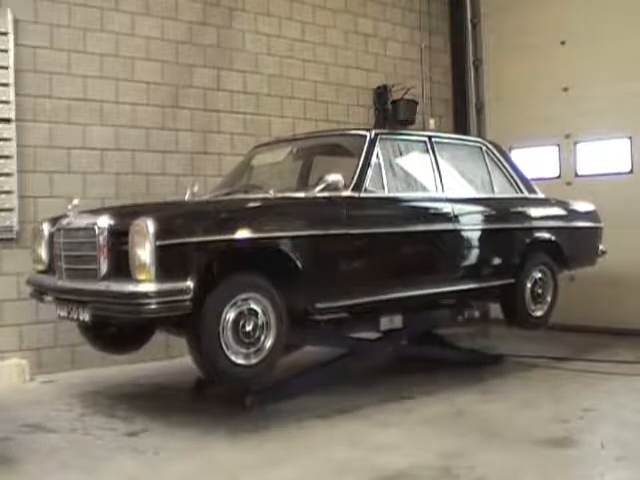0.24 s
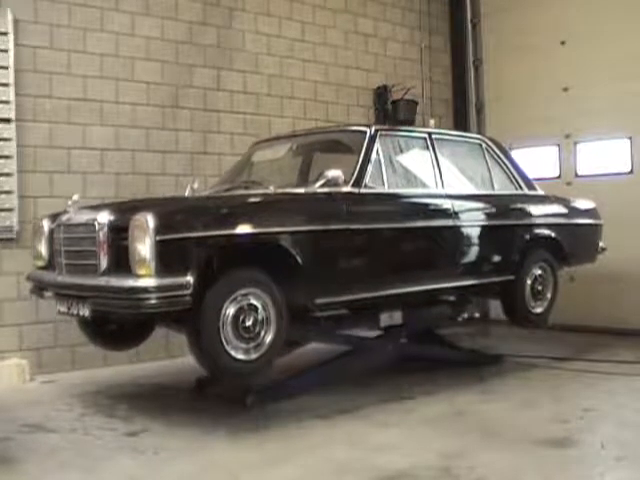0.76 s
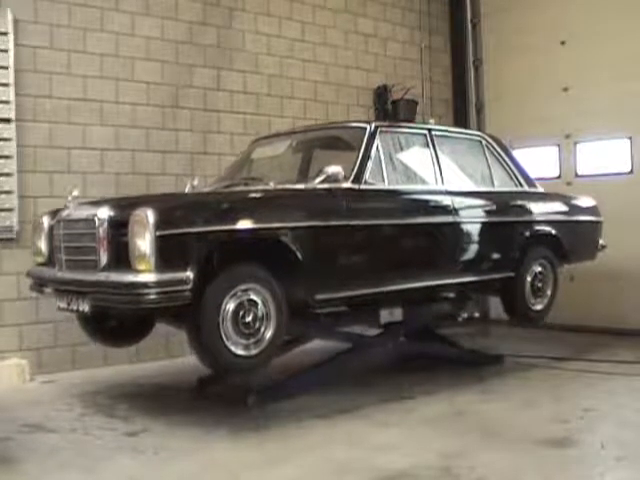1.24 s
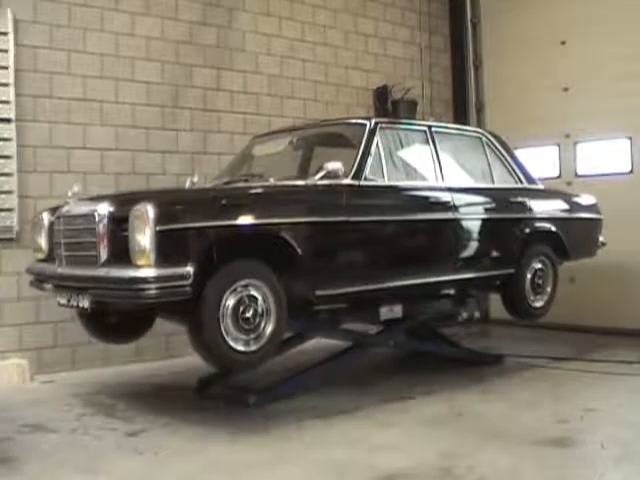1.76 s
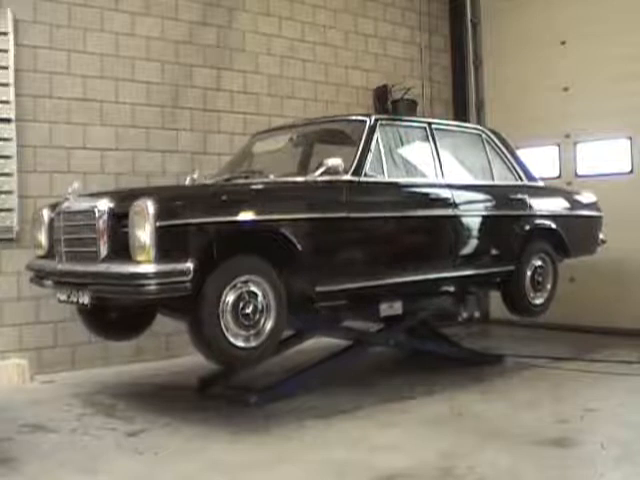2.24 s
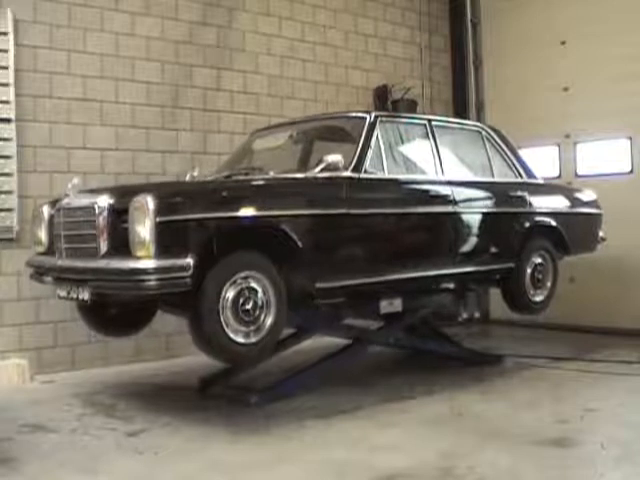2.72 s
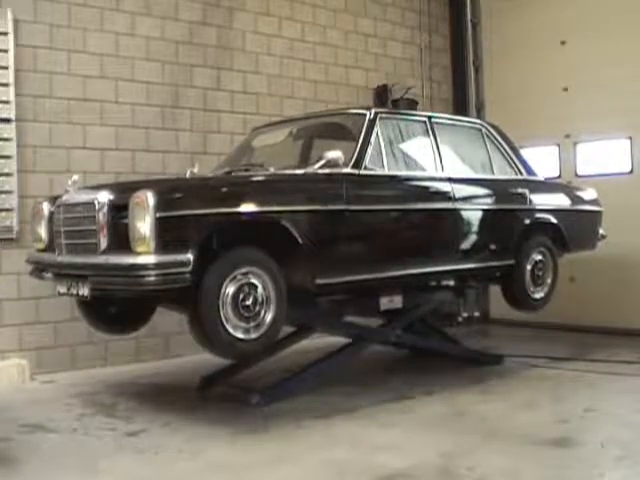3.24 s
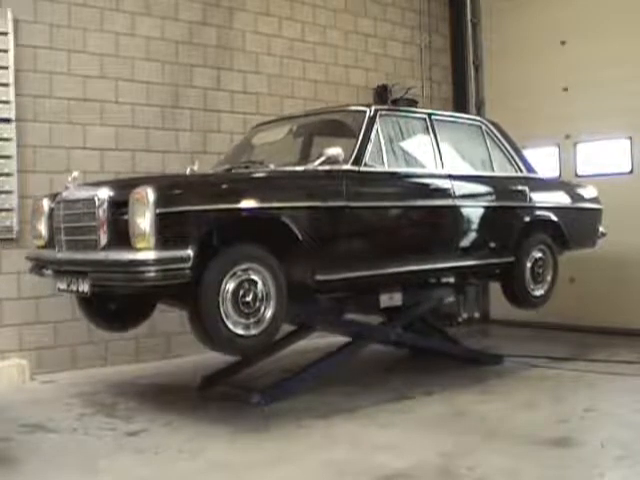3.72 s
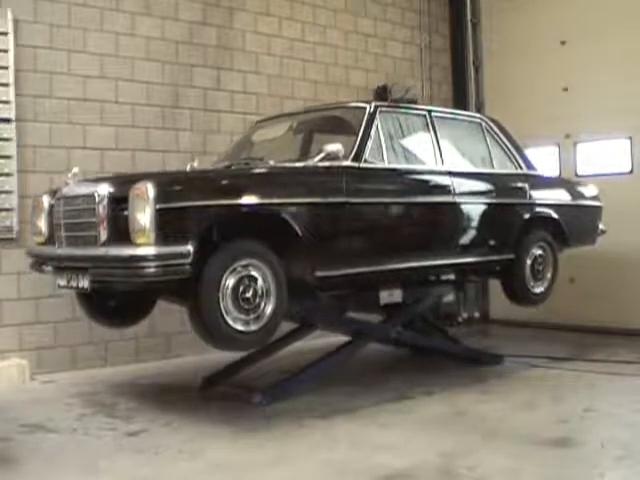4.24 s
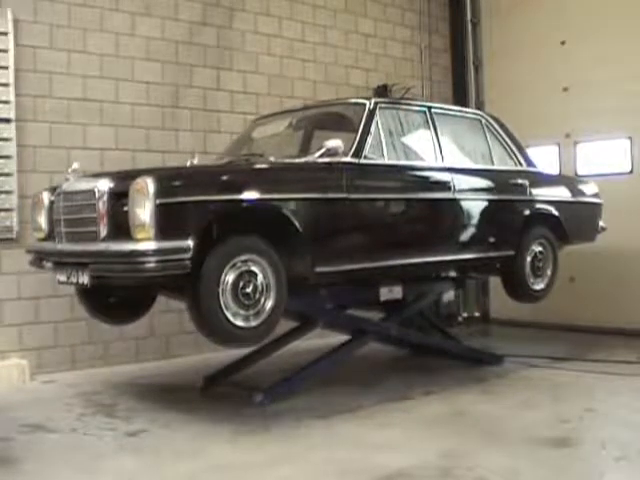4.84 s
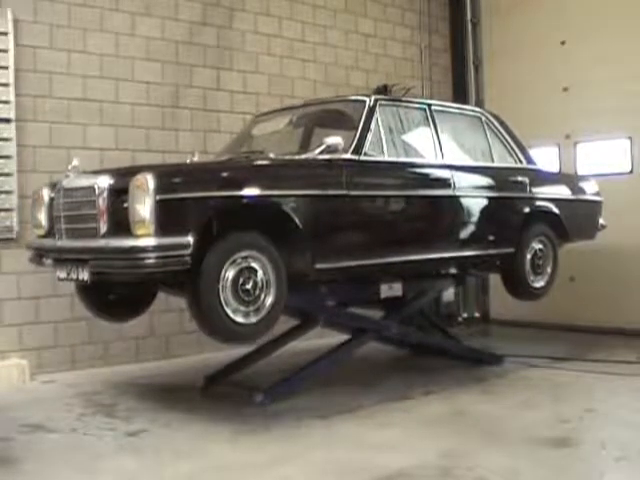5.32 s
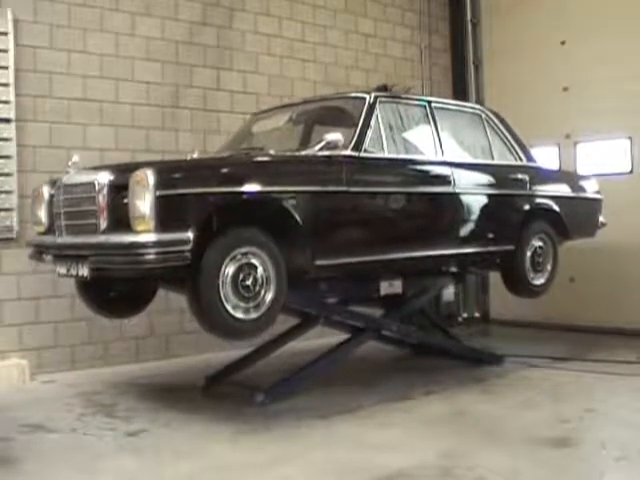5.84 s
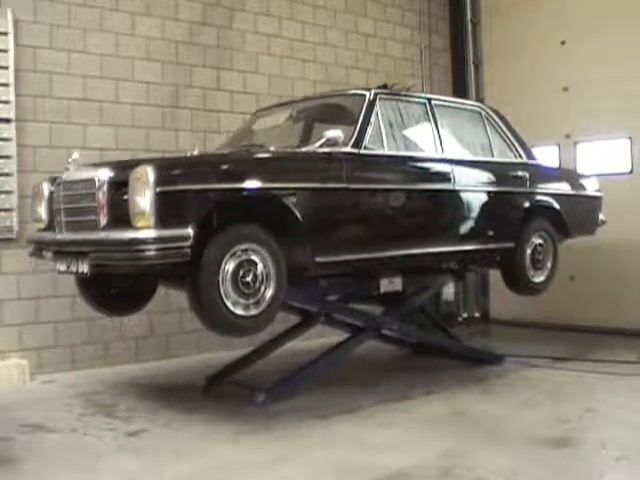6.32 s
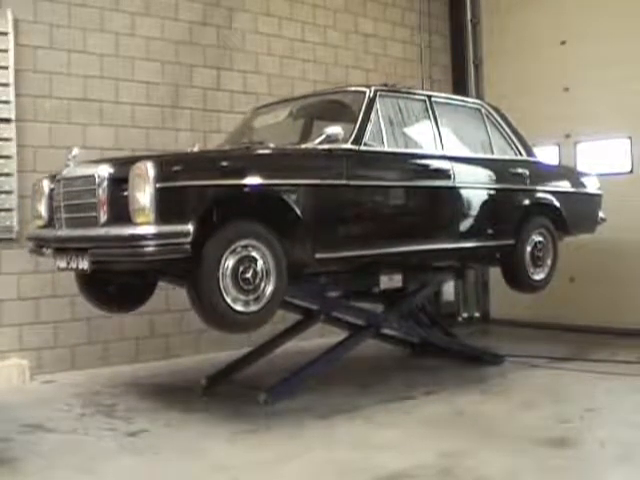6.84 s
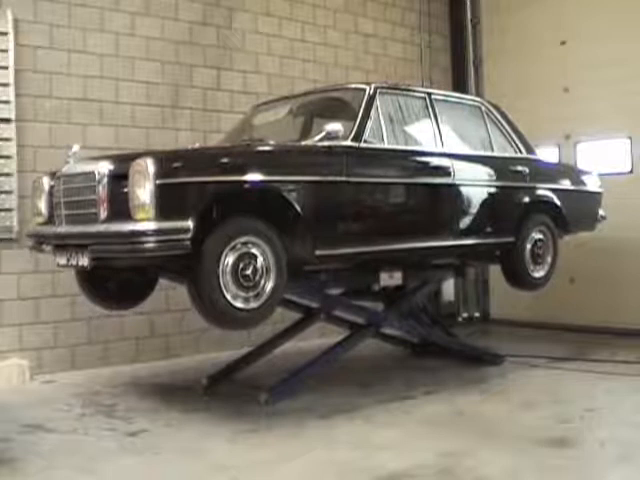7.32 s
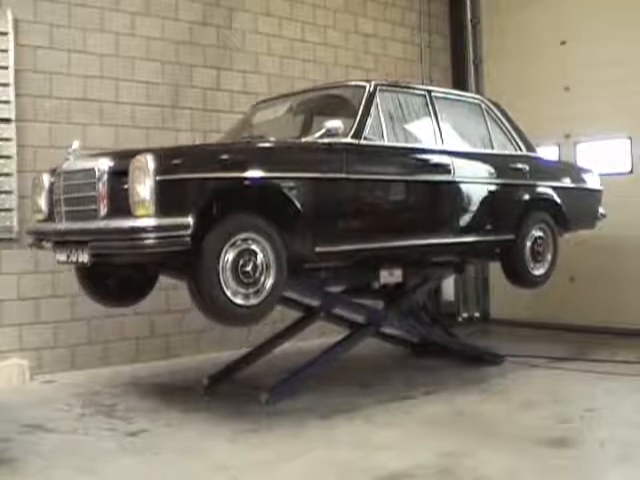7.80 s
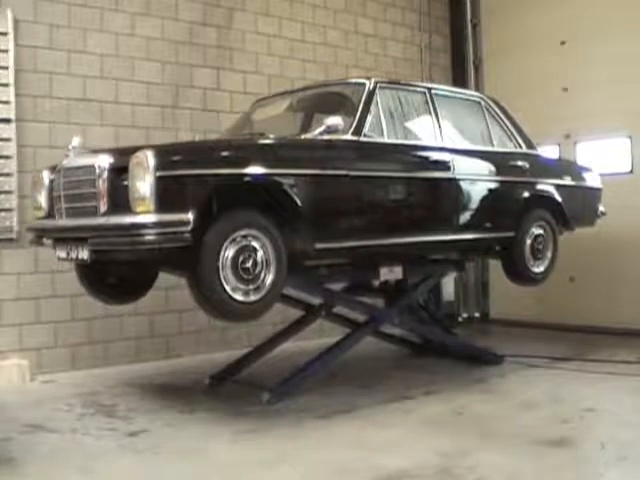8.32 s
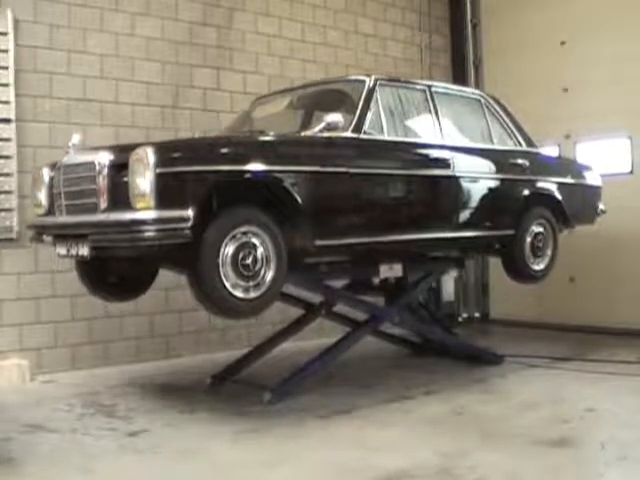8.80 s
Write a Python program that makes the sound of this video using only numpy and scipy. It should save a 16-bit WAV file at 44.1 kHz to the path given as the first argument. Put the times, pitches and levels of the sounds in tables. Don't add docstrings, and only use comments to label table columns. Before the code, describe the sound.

A constant, dense, buzzing mechanical whine, nearly fixed in pitch, with slowly swelling and fading overtones, comes from a hydraulic pump. Flowing oil adds hiss, and mains hum sits low. Three bright metallic clanks, evenly spaced almost four seconds apart, cut through it, each a rapid double hit with a short hollow garage echo. Stereo pickup, close to mono, with slightly coarse treble.

```python
import sys
import numpy as np
from scipy import signal
from scipy.fft import rfft, irfft, next_fast_len
from scipy.io import wavfile
from scipy.ndimage import uniform_filter1d, map_coordinates

SR = 44100
rng = np.random.default_rng(int(sys.argv[2]) if len(sys.argv) > 2 else 0)


def put_to_file(sound):
    columns = np.atleast_2d(sound).T
    safe = np.clip(columns, -1, 1)
    whole_steps = np.round(safe * 32767)
    wavfile.write(sys.argv[1], SR, whole_steps.astype(np.int16))


def field_ratio(decibels):
    return 10 ** (np.asarray(decibels, dtype=float) / 20)


N = 399546
T = np.arange(N) / SR

TEETH = 9
START_HZ, GAIN_HZ, SETTLE_S = 48.759, .302, 5.3
ECHO_S, STEADY = .11, .3
RUMBLE_DB, THUD_T60_S = -62, 0.36
PASSING_S, PASSING_HALF_WIDTH_S, PASSING_LIFT_DB = 8.3, .3, 9.4
BOUNCE_S, BOUNCE_DB = .022, -4

# (tooth harmonic, 2 below [dB], 1 below [dB], itself [dB], 1 above [dB], 2 above [dB])
TOOTH_TONES = [(1, -69, -56.5, -48, -60.5, -57.5), (2, -68.5, -64, -44.5, -72, -80),
               (3, -54, -66, -56.5, -70, -103), (4, -59, -58.5, -48.5, -67.5, -57),
               (5, -55, -47, -44, -50, -44), (6, -50, -41, -45.5, -49.5, -58.5),
               (7, -54, -61, -42, -52, -57), (8, -52.5, -48, -52, -50, -53), (9, -64, -59.5, -54, -72, -59),
               (10, -64.5, -61.5, -58, -63, -81), (11, -64, -64.5, -57, -74, -70),
               (12, -51, -52.5, -51.5, -49.5, -55.5), (13, -58, -42, -52, -48, -59),
               (14, -51.5, -48, -37.5, -44.5, -51), (15, -52, -57.5, -64, -68, -60),
               (16, -81, -61.5, -59.5, -73.0, -65)]
# (tooth harmonic, level [dB], first sidebands [dB])
HIGH_TOOTH_TONES = [(17, -60.5, -80), (18, -62, -70), (19, -64.5, -68), (20, -64.5, -70),
                    (21, -64.5, -69.5), (22, -64, -73), (23, -63.5, -71), (24, -59.5, -81), (25, -62, -91),
                    (26, -69.5, -87), (27, -66.5, -92), (28, -73, -89), (29, -75, -90), (30, -79.5, -98),
                    (31, -100.0, -100)]
# (shaft order, time [s], half-width [s], lift [dB])
STANDING_WAVES = [(8, 8, 1.9, 8), (9, 0.99, 2.28, 18.5), (9, 8, 2.3, 7), (18, 4.8, 2.9, -5),
                  (36, 0.1, 3, 9), (36, 7.2, 1.9, 8.5), (44, 0, 1.25, 10), (45, 2, 0.44, -12),
                  (46, 2, 0.68, 12), (47, 3, 1.64, 8), (47, 6.5, 0.75, 6.5), (53, 8, 0.35, -9.5),
                  (54, 4.5, 1.7, 7), (54, 7.5, 1.4, 9), (55, 2.7, 3, 11), (55, 7, .5, 11),
                  (63, 0.5, 1.5, -12.5), (71.15, 7.5, 3.5, 7), (71.97, 1.5, .7, 9), (72, 6.5, 1.24, 16),
                  (71.5, 7.5, 0.47, 11), (107, 4, 2, 9.5), (107.05, 7, 0.85, 5), (107.9, 2.5, 0.79, 13),
                  (116, 5, 0.71, -8), (117, 4.5, 0.59, 15), (125.9, 2.5, 0.7, -13), (126.1, 6, 0.26, -9),
                  (127.74, 2.5, 1.9, 9.5), (126.8, 6.4, 0.59, 6.5)]
# (frequency [Hz], level [dB per Hz])
OIL_HISS = [(30, -78.5), (60, -80), (200, -82), (500, -79), (1000, -91), (1250, -81.5), (2300, -87),
            (3000, -91), (3600, -82), (4400, -86.5), (6100, -86), (7500, -85.5), (10500, -97.5),
            (13000, -135)]
# (frequency [Hz], level [dB])
MAINS_TONES = [(30, -65.5), (150, -70), (300, -63), (500, -49.5)]
# (time [s], peak [dB], late bounce lag [s], late bounce level [dB], floor thud [dB])
PAWL_DROPS = [
    (1.101, -9.5, 0.064, -17, -54),
    (4.954, -8.5, 0.042, -16, -47),
    (8.823, -10, 0.048, -28.5, -61),
]
# (frequency [Hz], level [dB per Hz])
DROP_COLOURS = [
    [(130, -53), (220, -12.5), (431, -14.5), (618, -14.5), (774, -9), (1000, -13), (1270, -2.5),
     (2580, -5.5), (3070, 3.5), (3460, -8.5), (5610, -3.5), (10600, -19), (13500, -66)],
    [(130, -49), (220, -16), (305, -18), (494, -3.5), (608, -8), (774, -11.5), (919, -12.5), (1830, 0.5),
     (2450, -3.5), (3230, 1), (4410, -9), (5610, -1.5), (13500, -25)],
    [(130, -51), (220, -20), (382, -7), (710, -8), (787, -4.5), (1130, -12), (1320, -7.5), (2330, 2),
     (3020, -5), (5420, -3.5), (7390, -5.5), (12400, -24.5), (13500, -33)],
]
# (frequency [Hz], level [dB])
DROP_TREBLE = [(7400, -1.5), (7900, -4.5), (11800, 4.5), (12400, -20), (14000, -20)]
# (frequency [Hz], 60 dB decay [s], drop 1 [dB], drop 2 [dB], drop 3 [dB])
FRAME_MODES = [(396, 0.6, -29, -15.5, -19), (494, 0.42, -23, -19.5, -17), (766, 1, -17, -15, -18.5),
               (777, 0.8, -16, -11.5, -17.5), (1384, 0.14, -14, -4, -20), (1854, 0.23, -14, -13, -18),
               (2323, 0.17, -15, -25, -13), (3190, 0.74, -17, -17, -20), (3250, 0.83, -21, -16.5, -20),
               (4380, 0.68, -21, -26, -17), (5550, 0.61, -18, -16, -14.5), (5720, 0.6, -17, -12, -20),
               (7370, 0.31, -7.5, -23, -20), (13250, .5, -22, 6, 13)]
# (frequency [Hz], 60 dB decay [s])
ROOM_DECAY = [(250, 0.67), (700, 0.83), (1800, 0.6), (4500, 0.74), (8000, 0.57), (12000, 0.21)]
# (frequency [Hz], level [dB])
RIGHT_SHARED = [(30, -3.5), (150, -.4), (400, 0), (7300, 0), (8000, -6), (8800, -20), (10000, -25),
                (11500, -20), (12600, -11)]
# (frequency [Hz], level [dB])
RIGHT_OWN = [(30, -11), (150, -6), (400, -23), (1000, -11.5), (2500, -13), (5000, -11), (7200, -4),
             (8000, -7.5), (8800, 0), (10000, -12), (11500, -10), (12600, -5)]
# (frequency [Hz], level [dB])
MASKED_UNDER = [(600, -60), (1400, -12), (4500, -11), (9000, -14), (11200, -7), (12200, -4), (13500, -3)]
# (frequency [Hz], level [dB])
TOO_QUIET = [(9500, -125), (11000, -92), (13500, -85)]


def colour(x, *curves):
    size = next_fast_len(len(x), real=True)
    f = np.log(np.maximum(np.arange(size // 2 + 1) * SR / size, 1))
    db = sum(np.interp(f, np.log(hz), level) for hz, level in map(np.transpose, curves))
    return irfft(rfft(x, size) * field_ratio(db), size)[:len(x)]


def unit(x):
    return x / np.sqrt(np.mean(np.abs(x) ** 2, axis=0))


def walk(rate):
    k = int(SR / rate)
    steps = np.repeat(rng.standard_normal(N // k + 1), k)
    return unit(uniform_filter1d(uniform_filter1d(steps, k), k)[:N])


def shaft_hz():
    return START_HZ + GAIN_HZ * (1 - np.exp(-T / SETTLE_S))


def order_levels(far_db=-7, top_far_db=-4):
    db = np.full(TEETH * 32, -120.)
    for m, low2, low1, mid, up1, up2 in TOOTH_TONES:
        k = TEETH * int(round(m))
        db[k - 4:k] = low2 + 1.29 * far_db, low2 + far_db, low2, low1
        db[k:k + 5] = mid, up1, up2, up2 + far_db, up2 + 1.56 * far_db
    away = np.abs(np.arange(-4, 5))
    for m, mid, side in HIGH_TOOTH_TONES:
        k = TEETH * int(round(m))
        db[k - 4:k + 5] = side + top_far_db * np.minimum(away - 1, 1)
        db[k] = mid
    db[:TEETH - 2] = -120.
    return db


def gears(treble_db=3.5, base_db=-5, scramble=0.23):
    hz = shaft_hz()
    hop, points = 4096, 8192
    rows = np.arange(0, N + hop, hop)
    db = order_levels()
    order = np.arange(len(db))

    echo_noise = rng.standard_normal(SR) * np.exp(-np.arange(SR) / SR / ECHO_S)
    echo = rfft(echo_noise, 8 * SR)
    where = 8 * np.outer(hz[np.minimum(rows, N - 1)], order)
    gain = unit(STEADY + unit(echo[np.round(where).astype(int)]))

    for k, *_ in STANDING_WAVES:
        gain[:, int(round(k))] = field_ratio(base_db)
    for k, s, width, lift_db in STANDING_WAVES:
        swell = np.exp(-((rows / SR - s) / max(width, .1)) ** 2)
        gain[:, int(round(k))] *= field_ratio(lift_db * swell)
    gain = gain * field_ratio(db + treble_db * (order > 170))

    family = np.round(order / TEETH).astype(int)
    start, throb_at = rng.random((2, len(db)))[:, family]
    drift = uniform_filter1d(rng.standard_normal(gain.shape), size=12, axis=0)
    slide = drift.cumsum(axis=0) * .06 * np.sqrt(order / 50)
    disorder = (scramble + (order > 150)) * rng.random(len(db))
    phase = start + .3 * throb_at * order + disorder + slide
    gain = gain * np.exp(2j * np.pi * phase)

    turn = irfft(gain, points, axis=1) * points / np.sqrt(2)
    turn = np.hstack([turn, turn[:, :1]])
    angle = np.cumsum(hz) / SR % 1
    return map_coordinates(turn, [np.arange(N) / hop, angle * points], order=1), angle


def oil(angle, skirt_db=-36, skirt_hz=45, throb=0.22, flutter_db=1.16, treble_db=9):
    turn_hz = np.mean(shaft_hz())
    power = field_ratio(2 * order_levels())
    power[17 * TEETH:] *= field_ratio(2 * treble_db)
    power[:3 * TEETH - 4] = 0

    f = np.arange(0, SR / 2, 10)
    size = next_fast_len(N, real=True)
    distance = f[:, None] - turn_hz * np.arange(len(power))
    skirts = np.exp(-.5 * (distance / skirt_hz) ** 2) @ power
    fine_hz = np.arange(size // 2 + 1) * SR / size
    shape = field_ratio(skirt_db) * np.sqrt(np.interp(fine_hz, f, skirts) + 1e-30)
    blur = irfft(rfft(rng.standard_normal(size)) * shape, size)[:N]
    blur = blur * (1 + throb * np.cos(2 * np.pi * angle))

    flow = [(15, -100)] + list(OIL_HISS)
    # (Hz, dB)
    housing = [(1340, 0), (1420, -16), (1530, -16), (1620, 0), (1850, 0), (1950, -8), (2060, 0),
               (4080, 0), (4190, -9), (4300, 0), (4500, 0), (4610, -10), (4720, 0)]
    hiss = colour(rng.standard_normal(N), flow, housing)
    return np.sqrt(SR / 2) * (hiss + blur) * field_ratio(flutter_db * walk(3.07))


def hum(fade_in_db=-5):
    lines = np.zeros(N)
    for hz, db in MAINS_TONES:
        level = np.sqrt(2) * field_ratio(db + 2.0 * walk(1.29))
        lines += level * np.sin(2 * np.pi * (hz * T + rng.random()))
    lines = lines * field_ratio(fade_in_db * np.exp(-T / SETTLE_S))

    low = unit(colour(rng.standard_normal(N), [(50, -26), (90, -5.5), (240, -3.5), (350, -28), (700, -90)]))
    passing_db = PASSING_LIFT_DB * np.exp(-((T - PASSING_S) / PASSING_HALF_WIDTH_S) ** 4)
    outside = field_ratio(RUMBLE_DB + passing_db + 2.0 * walk(14) + 2.7 * walk(2.5))

    drops = np.array(PAWL_DROPS)
    since = np.maximum(T - drops[:, :1], 0)
    thuds = field_ratio(drops[:, 4:] - 60 * since / THUD_T60_S) * (1 - np.exp(-since / .015))
    return lines + low * (outside + thuds.sum(axis=0))


def pawl(fill_s=0.00089, direct_db=-2, ring_db=-0.5, trim_db=-8):
    out, t = np.zeros(N + SR), T[:24576]
    centres = 200 * 2 ** np.arange(0, 6.2, .5)[:, None]
    f = np.maximum(np.arange(len(t) // 2 + 1) * SR / len(t), 1)
    masks = np.maximum(1 - 2 * np.abs(np.log2(f / centres)), 0)
    room_hz, room_t60 = np.transpose(ROOM_DECAY)
    t60 = np.interp(np.log(centres), np.log(room_hz), room_t60)
    rise = 1 - np.exp(-t / (fill_s * 1000 / centres + 0.00082))
    shape = rise * (field_ratio(-60 * t / t60) + field_ratio(direct_db) * np.exp(-t / 0.0052))

    for drop, (event, clack) in enumerate(zip(PAWL_DROPS, DROP_COLOURS)):
        s, db, late, late_db, _ = event
        for delay, blow_db in ((0, 0), (BOUNCE_S, BOUNCE_DB), (late, late_db)):
            noise = rfft(rng.standard_normal(len(t)))
            tail = np.sum(irfft(noise * masks) * shape, axis=0)
            detune = 1 + 0.0083 * rng.standard_normal(len(FRAME_MODES))
            ring = np.zeros(len(t))
            for (hz, fade, *g), d in zip(FRAME_MODES, detune):
                decay = field_ratio(g[drop] - 60 * t / fade)
                onset = 1 - np.exp(-t * hz / 4.0)
                ring += decay * np.sin(2 * np.pi * hz * d * t) * onset
            blow = colour(tail + field_ratio(ring_db) * ring, clack, DROP_TREBLE)
            blow = blow / np.sqrt(np.mean(blow[:2000] ** 2))
            i = int((s - .0012 + max(delay, 0)) * SR)
            out[i:i + len(t)] += field_ratio(db + blow_db + trim_db) * blow
    return out[:N]


def scene():
    spots, mains = [], hum()
    for spot in range(2):
        whine, angle = gears()
        spots.append(whine + oil(angle) + np.roll(mains, 9000 * spot) + pawl())
    return np.array(spots)


def blocks(values, height, width, shape):
    return np.kron(values, np.ones((height, width)))[:shape[0], :shape[1]]


def drop_masked(x, narrow_hz=130, wide_hz=900, moody_db=2.5):
    f, s, z = signal.stft(x, SR, nperseg=1024)
    plane = (len(f), len(s))
    power = np.mean(np.abs(z) ** 2, axis=0)
    near = uniform_filter1d(power, size=max(int(narrow_hz / f[1]), 1), axis=0)
    around = uniform_filter1d(power, size=max(int(wide_hz / f[1]), 1), axis=0)
    limits = []
    for curve in (MASKED_UNDER, TOO_QUIET):
        hz, db = np.transpose(curve)
        limits.append(field_ratio(2 * np.interp(np.log(f + 1), np.log(hz), db))[:, None])
    under, quiet = limits
    mood = blocks(rng.standard_normal((len(f) // 4 + 1, len(s) // 6 + 1)), 4, 6, plane)
    needed = (around * under + quiet) * field_ratio(2 * moody_db * mood)
    keep = uniform_filter1d(near, size=3, axis=1) > needed

    patch = blocks(rng.random((len(f) // 8 + 1, len(s) // 7 + 1)) < .33, 8, 7, plane)
    patch = np.maximum(patch, ((f < 850) | (f > 7500))[:, None])
    middle, side = (z[0] + z[1]) / 2, (z[0] - z[1]) / 2 * patch
    z = np.array([middle + side, middle - side])
    return signal.istft(z * np.maximum(keep, .004), SR, nperseg=1024)[1][:, :N]


def low_pass(x):
    return signal.sosfilt(signal.butter(12, 14010, fs=SR, output="sos"), x)


def record(dry):
    right = colour(dry[0], RIGHT_SHARED) + colour(dry[1], RIGHT_OWN)
    mix = drop_masked(np.array([dry[0], right]))
    return low_pass(mix)


dry = scene()
out = record(dry)
put_to_file(out)
```